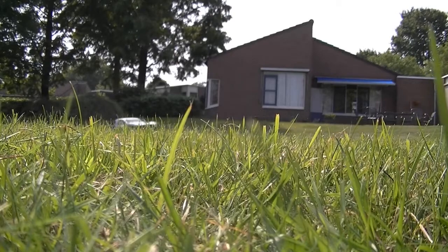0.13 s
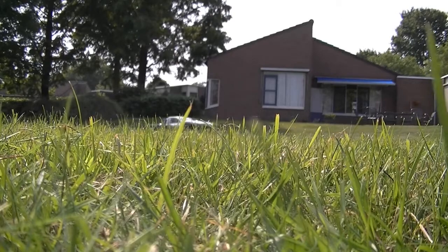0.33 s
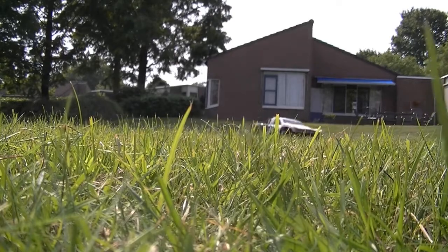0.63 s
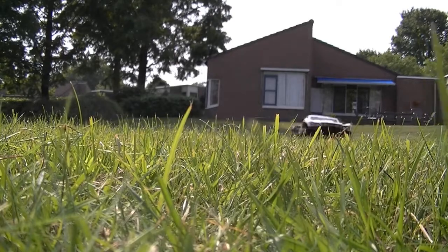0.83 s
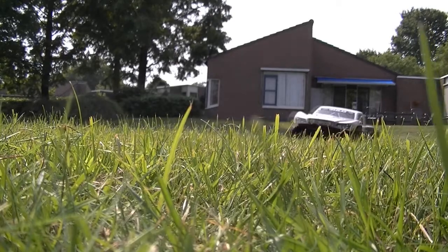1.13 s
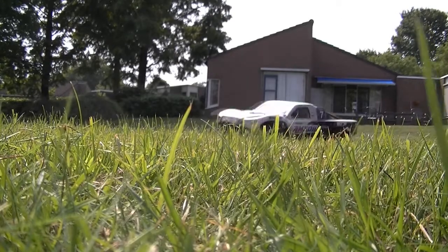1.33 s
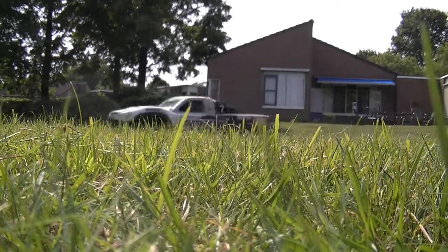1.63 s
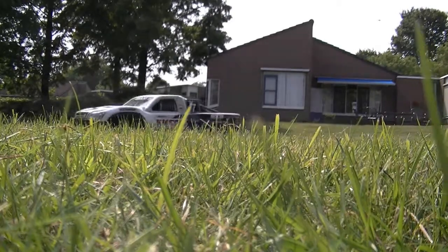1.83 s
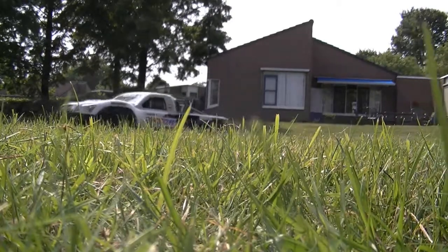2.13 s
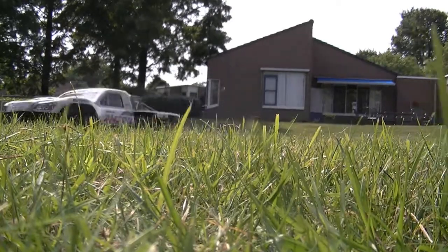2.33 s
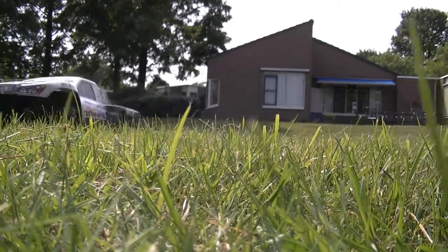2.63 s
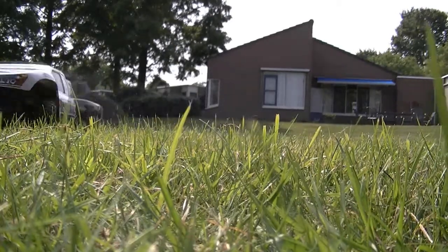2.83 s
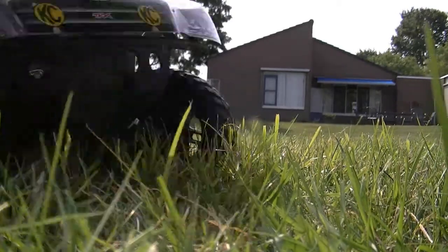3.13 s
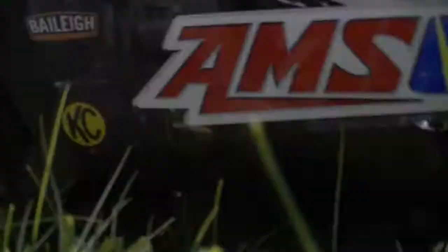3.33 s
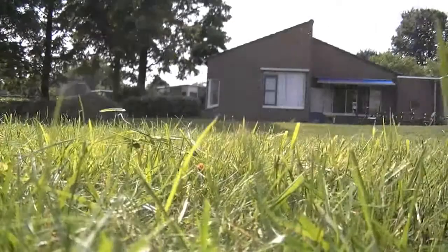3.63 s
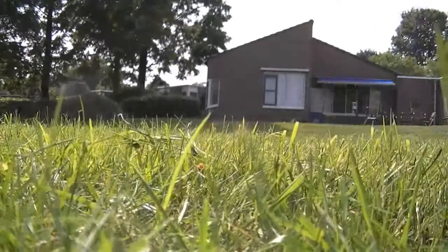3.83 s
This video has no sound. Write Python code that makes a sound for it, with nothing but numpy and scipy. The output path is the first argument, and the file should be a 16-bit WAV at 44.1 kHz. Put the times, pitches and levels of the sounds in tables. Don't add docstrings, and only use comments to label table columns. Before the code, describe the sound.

A toy electric truck circles on a lawn, its motor whining in short upward sweeps, then rattles and knocks hard past a stereo microphone lying in the grass, crossing left to right in a quiet garden.

```python
import sys
import numpy as np
from scipy import signal
from scipy.fft import rfft, irfft
from scipy.io import wavfile
from scipy.ndimage import uniform_filter1d, map_coordinates

SR = 44100
rng = np.random.default_rng(int(sys.argv[2]) if len(sys.argv) > 2 else 0)


def wrap_up_sound(samples):
    columns = np.atleast_2d(samples).T
    tamed = np.clip(columns, -1, 1)
    steps = np.round(tamed * 32767).astype(np.int16)
    wavfile.write(sys.argv[1], SR, steps)


def linear_from_db(decibels):
    return 10 ** (np.asarray(decibels, float) / 20)


N = 176400
T = np.arange(N) / SR

# (time [s], gear mesh [Hz], mesh level [dB], whir level [dB])
FAR_BURSTS = [
    [(.22, 1400, -64, -76), (.274, 1750, -60, -75), (.324, 2219, -51, -66), (.348, 2742, -58, -62),
     (.375, 3300, -51, -58), (.418, 3629, -45, -60), (.454, 3645, -59, -62), (.52, 3470, -72, -66)],
    [(.88, 1333, -57, -54), (.9, 1400, -56, -53), (.938, 1684, -47, -52), (.975, 2200, -54, -52),
     (1.0, 2699, -45, -53), (1.045, 2770, -44, -52), (1.065, 2660, -56, -48), (1.12, 2600, -66, -47)],
    [(1.14, 2650, -75.5, -58), (1.5, 3324, -86, -60), (1.58, 3460, -57.5, -53), (1.72, 3160, -66, -56.5)],
]
# (time [s], gear mesh [Hz], mesh level [dB], whir level [dB])
NEAR_BURSTS = [
    [(2.162, 1950, -44, -44), (2.173, 1706, -35, -48), (2.184, 1470, -33, -52), (2.209, 1709, -35, -49),
     (2.243, 2052, -38, -47), (2.273, 2261, -43, -45), (2.287, 2576, -39, -44), (2.325, 2715, -39, -44),
     (2.345, 2600, -60, -48)],
    [(2.712, 700, -37, -46), (2.748, 657, -31, -53), (2.77, 993, -28, -45), (2.806, 1666, -31, -38),
     (2.87, 2742, -34, -33), (2.93, 3600, -33, -34), (2.994, 3540, -34, -34), (3.045, 4450, -37, -35),
     (3.085, 4650, -44, -30)],
    [(3.648, 700, -18, -33), (3.69, 800, -19, -33), (3.72, 1150, -25, -33), (3.742, 1510, -18, -34),
     (3.75, 1700, -26, -33), (3.794, 2557, -28, -33), (3.832, 3292, -32, -34), (3.9, 3680, -34, -36),
     (4.02, 4280, -39, -40)],
]
BURST_HUM_DB = [11, 8, 8, 11, 7, 6]
MESH_DB = [2, -6, -12, -14, -28]
HUM_DB = [-14, 0, -14, -7]
# (frequency [Hz], gain [dB])
GEARBOX_DB = [(3600, 0), (5400, 2), (6400, -6), (7200, 6), (8300, -16), (9600, 11), (10800, 15),
              (12500, -18)]
# (frequency [Hz], gain [dB])
HUM_BODY_DB = [(300, -4), (480, -1), (680, 2), (850, 0), (2000, -3)]
# (frequency [Hz], density [dB per Hz])
WHIR_DB = [(300, -27.5), (700, -1.5), (2500, -14), (5300, -11), (6500, -14.5), (10300, -4.5),
           (12000, -12.5), (15500, -37)]
# (time [s], shell boom [dB], rattle re boom [dB])
ROLL = [(0, -58.5, 1), (.43, -32.5, -14), (0.719, -47.5, -7), (1.049, -52.5, 3.5), (1.36, -47, -6.5),
        (1.651, -47.5, -27), (1.8, -57.5, 0.5), (2.14, -70, 7), (2.165, -39, 3), (2.381, -35, -1),
        (2.418, -38, -9.5), (2.7, -54.5, 0.5), (2.73, -40, -2), (3.05, -32, 5.5), (3.15, -28, 4.5),
        (3.38, -24, 0.5), (3.46, -21.5, -8.5), (3.62, -28, 1.5), (4, -37.5, 4)]
# (frequency [Hz], width [Hz], level [dB])
SHELL_MODES = [(691, 71, 0), (1140, 300, -7), (2650, 55, -7), (3530, 260, -11.5)]
# (frequency [Hz], density [dB per Hz])
RATTLE_DB = [(100, -50.5), (330, -10), (727, -2.5), (917, -3), (2630, -9), (3460, -11), (11000, -18),
             (15500, -24.5)]
# (mid time [s], level [dB], frequency [Hz], length [s])
BUMPS = [(0.367, -30, 697, 0.067), (0.523, -37, 723, 0.018), (1.555, -32.5, 667, 0.056),
         (1.59, -36.5, 668, 0.054), (2.101, -34, 1377, 0.0063), (2.149, -23, 724, 0.006),
         (2.32, -17, 678, 0.012), (2.166, -22.5, 730, 0.013), (2.345, -27, 735, 0.015),
         (2.395, -22.5, 745, 0.01), (3.34, -16, 756, 0.027), (3.244, -12.5, 2730, 0.0092),
         (3.317, -13.5, 1190, 0.013), (3.359, -14.5, 2650, 0.011), (3.356, -14, 3530, 0.0095),
         (3.411, -13.5, 724, 0.039), (3.433, -5, 686, 0.017), (3.497, -11.5, 701, 0.026),
         (3.555, -18, 678, 0.026)]
# (mid time [s], level [dB], frequency [Hz], length [s])
SKIDS = [
    (.915, -34, 900, .016),
    (2.386, -28, 1700, .014),
    (3.149, -11, 2550, .018),
    (3.219, -14, 1780, .019),
    (3.27, -19, 1350, .014),
]
# (time [s], peak level [dB], tilt [dB per octave])
SNAPS = [(0.1348, -3.5, 4.5), (0.1459, -19, 0.5), (0.1526, -17.5, 1.5), (0.162, -22.5, -0.5),
         (0.7507, -14, 1), (0.76, -15.5, -1.5), (0.913, -30.5, -19), (0.572, -33.5, -16), (1.478, -26, 2.5),
         (1.984, -26.5, -10.5), (2.095, -30.5, -4.5), (2.148, -25, 4.5), (2.161, -18.5, -8.5),
         (2.376, -18.5, -5), (2.714, -21.5, 7), (3.129, -3.5, 4.5), (3.615, -10, 2.5)]
# (frequency [Hz], density [dB per Hz])
SNAP_DB = [(300, -37.5), (780, 1.5), (1000, -8.5), (1440, 0), (1900, -22.5), (4300, 2), (6000, -8.5),
           (10300, -1), (15500, -39)]
# (mid time [s], level [dB], frequency [Hz], length
# [s])
BRUSHES = [(0.62, -50.5, 356, 0.089), (0.764, -37.5, 4040, 0.013), (1.17, -43.5, 900, .03),
           (1.338, -39, 320, .02), (1.342, -43, 836, .02), (1.384, -40, 590, 0.026),
           (.015, -49, 2980, .007), (1.475, -43, 830, .03), (3.078, -28, 3240, 0.0091),
           (3.195, -26, 1900, 0.027), (3.268, -20.5, 1330, 0.012), (3.308, -20.5, 1210, 0.0079),
           (3.311, -32, 4460, .015), (3.396, -47, 121, 0.035), (3.506, -53, 90, 0.028),
           (3.615, -27, 6940, 0.0061), (3.975, -43.5, 305, .04)]
# (frequency [Hz], density [dB per Hz])
GARDEN_SHAPE_DB = [(25, -32), (130, -16), (680, -2.5), (1500, -18), (2200, -29), (6500, -32.5),
                   (9500, -22.5), (15500, -46)]
# (time [s], side [-1 right .. 1 left])
SIDE_OF = [
    (0, 0.66),
    (2.5, 0.86),
    (3.25, .6),
    (3.45, -0.93),
    (3.65, -0.71),
]
# (frequency [Hz], level [dB])
TWIST_DB = [(200, -55), (900, -2.5), (2500, -8), (9000, -15.5)]

HUM_RATIO, HUM_STARTS_HZ = .24, 440
THROTTLE_EDGE_S, RUNOUT = .008, .5
UPPER_STARTS_HZ, UPPER_FADES_HZ = 700, 1900
SAG_PER_S, SKID_PER_S = 1, 17
SNAP_DECAY_S, SNAP_TOP_DECAY_S, SNAP_LEAD_S = .006, .0016, .01
GARDEN_DB, FAN_HZ, FAN_DB = -48.5, 140, -70.5
PAN_DB, LAG_S, LEFT_DB = 6.5, .00008, -1.5


def unit(x):
    return x / np.sqrt(np.mean(x ** 2))


def colour(x, points):
    hz, db = np.array(points, float).T
    f = np.maximum(np.fft.rfftfreq(len(x), 1 / SR), 1)
    return irfft(rfft(x) * linear_from_db(np.interp(np.log(f), np.log(hz), db)), len(x))


def ring(x, hz, width_hz):
    return signal.lfilter(*signal.iirpeak(hz, hz / width_hz, fs=SR), x)


def walk(rate_hz):
    k = int(SR / rate_hz)
    held = np.repeat(rng.standard_normal(N // k + 1), k)
    return unit(uniform_filter1d(uniform_filter1d(held, k), k)[:N])


def grains(rate_hz, spread_db, hiss):
    size = linear_from_db(spread_db * np.minimum(rng.exponential(size=N), 4))
    clicks = (rng.random(N) < rate_hz / SR) * rng.standard_normal(N) * size
    return unit(clicks) + hiss * rng.standard_normal(N)


def patchy(x, points, db, rate_hz):
    full, out = colour(x, points), 0
    for hz in 90 * 2 ** np.arange(8):
        octave = colour(full, [(hz / 2, -40), (hz / 1.3, -1), (hz * 1.3, -1), (hz * 2, -40)])
        out = out + linear_from_db(db * walk(rate_hz)) * octave
    return unit(out)


def garden():
    mid, side = (patchy(rng.standard_normal(N), GARDEN_SHAPE_DB, 0.94, 7.9) for _ in range(2))
    side = colour(side, [(30, -1), (300, -5.0), (900, -8.5), (2500, -13)])
    fan = linear_from_db(FAN_DB + walk(3.7)) * np.sin(2 * np.pi * FAN_HZ * T)
    return linear_from_db(GARDEN_DB - 3) * (mid + side * np.array([[1], [-1]])) + fan


def rolling():
    s, boom_db, rattle_db = np.array(ROLL, float).T
    jolts = linear_from_db(1.5 * walk(55))
    shake = grains(900, 5, .7) * jolts
    boom_hz = SHELL_MODES[0][0]
    boom = unit(ring(ring(shake, boom_hz, 123), boom_hz, 136))
    parts = unit(sum(linear_from_db(db) * ring(shake, f, w * 0.5) for f, w, db in SHELL_MODES[1:]))
    rattle = patchy(grains(2500, 2.56, 1.0), RATTLE_DB, db=3.0, rate_hz=50) * jolts + 0.42 * parts
    boom_gain = linear_from_db(np.interp(T, s, boom_db) - 2.5)
    rattle_gain = linear_from_db(np.interp(T, s, boom_db + rattle_db) + 1.2)
    return boom_gain * boom + rattle_gain * rattle


def brushes():
    out = np.zeros(N)
    crunch = grains(3000, 4, .6)
    for s, db, hz, length_s in BRUSHES:
        i = slice(int((s - 2 * length_s) * SR), int((s + 2 * length_s) * SR))
        band = [(hz / 3, -24), (hz / 1.5, 0), (hz * 1.5, 0), (hz * 3, -18), (hz * 30, -50)]
        swell = np.exp(-(1.5 * (T[i] - s) / length_s) ** 2)
        out[i] += linear_from_db(db) * unit(colour(crunch[i], band)) * swell
    return out


def snaps():
    out = np.zeros(N)
    noise = rng.standard_normal((len(SNAPS), 4096))
    t = np.arange(4096) / SR - SNAP_LEAD_S
    attack = (t >= 0) * np.clip(t / .0003, 0, 1)
    low_decay = attack * np.exp(-np.maximum(t, 0) / SNAP_DECAY_S)
    top_decay = attack * np.exp(-np.maximum(t, 0) / SNAP_TOP_DECAY_S)
    for (s, db, tilt_db), n in zip(SNAPS, noise):
        crack = unit(colour(colour(n, SNAP_DB), [(250, -2 * tilt_db), (16000, 4 * tilt_db)]))
        low = colour(crack, [(2000, 0), (3500, -30)])
        i = int((s - SNAP_LEAD_S) * SR)
        out[i:i + 4096] += linear_from_db(db - 4) * (low * low_decay + (crack - low) * top_decay)
    return out


def wobble(depth_db):
    return linear_from_db(depth_db * walk(70) - 1) * (1 + .4 * walk(700))


def throttle():
    hz, mesh, hum, whir = np.full(N, 700.), np.zeros(N), np.zeros(N), np.zeros(N)
    for rows, hum_db in zip(FAR_BURSTS + NEAR_BURSTS, BURST_HUM_DB):
        s, f, db, whir_db = np.array(rows, float).T
        on = np.clip(np.minimum(T - s[0], s[-1] - T) / THROTTLE_EDGE_S + .5, 0, 1)
        hz = np.where(on > 0, np.interp(T, s, f), hz)
        mesh += on * linear_from_db(np.interp(T, s, db))
        hum += on * linear_from_db(uniform_filter1d(np.interp(T, s, db + hum_db), size=1800))
        whir += on * linear_from_db(np.interp(T, s, whir_db))
    hz = uniform_filter1d(hz, size=300) * (1 + .014 * walk(80) + .004 * walk(400))
    return hz, mesh, hum, whir


def gear_mesh(hz, turn):
    rise = np.clip(5 * hz / UPPER_STARTS_HZ - 5, 0, 1)
    fade = np.clip(3 - 3 * hz / UPPER_FADES_HZ, 0, 1)
    teeth = np.zeros(N)
    for k, db in enumerate(MESH_DB):
        gate = 1 if k < 2 else rise if k < 3 else rise * fade
        teeth += linear_from_db(db) * wobble(1.8) * np.sin((k + 1) * turn) * gate
    return colour(teeth * (1 + RUNOUT * np.sin(turn * HUM_RATIO / 2)), GEARBOX_DB)


def motor_hum(hz, turn):
    half_turn = turn * HUM_RATIO / 2
    poles = sum(linear_from_db(db) * wobble(2) * np.sin((k + 1) * half_turn) for k, db in enumerate(HUM_DB))
    return colour(poles, HUM_BODY_DB) * np.clip(hz * HUM_RATIO / HUM_STARTS_HZ - .6, 0, 1) ** 2


def gear_whir(hz):
    hiss = patchy(grains(4000, 3, .6), WHIR_DB, db=2, rate_hz=40) * linear_from_db(1.5 * walk(60))
    low = colour(hiss, [(4000, 3.5), (7000, -18)])
    return linear_from_db(8) * (low + (hiss - low) * (hz / 3500) ** 1.25)


def drive():
    hz, mesh, hum, whir = throttle()
    turn = 2 * np.pi * np.cumsum(hz) / SR
    return 1.6 * mesh * gear_mesh(hz, turn) + 1.4 * hum * motor_hum(hz, turn) + whir * gear_whir(hz)


def bumps():
    out, rough = np.zeros(N), linear_from_db(2 * walk(400))
    for rows, sag in ((BUMPS, SAG_PER_S), (SKIDS, SKID_PER_S)):
        for s, db, hz, length_s in rows:
            i = slice(int((s - length_s) * SR), int((s + length_s) * SR))
            t = T[i] - s
            swell = np.exp(-(2.61 * t / length_s) ** 2)
            out[i] += linear_from_db(db) * swell * np.sin(2 * np.pi * hz * (t - sag * t * t / 2))
    return out * rough


def scene():
    highpass = signal.butter(N=3, Wn=200, btype="high", fs=SR, output="sos")
    truck = signal.sosfilt(highpass, rolling() + snaps() + drive() + bumps()) + brushes()
    side = np.interp(T, *np.array(SIDE_OF, float).T)
    twist = colour(signal.hilbert(truck).imag, TWIST_DB) * side
    ports = []
    for g in (1, -1):
        when = (T + g * side * LAG_S / 2) * SR
        heard = map_coordinates(truck - g * twist, [when], mode="mirror")
        ports.append(heard * linear_from_db(g * (side * PAN_DB + LEFT_DB) / 2))
    tails = rng.standard_normal((2, 4096)) * np.exp(-T[:4096] / .008)
    scatter = np.array([signal.fftconvolve(truck, h / np.linalg.norm(h))[:N] for h in tails])
    return np.array(ports) + scatter * linear_from_db(-9) + garden()


def top_cut(x):
    return signal.sosfilt(signal.butter(12, 16470, fs=SR, output="sos"), x)


def record(dry):
    top = signal.ellip(8, .2, 70, 15950, fs=SR, output="sos")
    mix = signal.sosfilt(top, np.tanh(dry * 0.61) / 0.59)
    return top_cut(mix)


dry = scene()
out = record(dry)
wrap_up_sound(out)
```